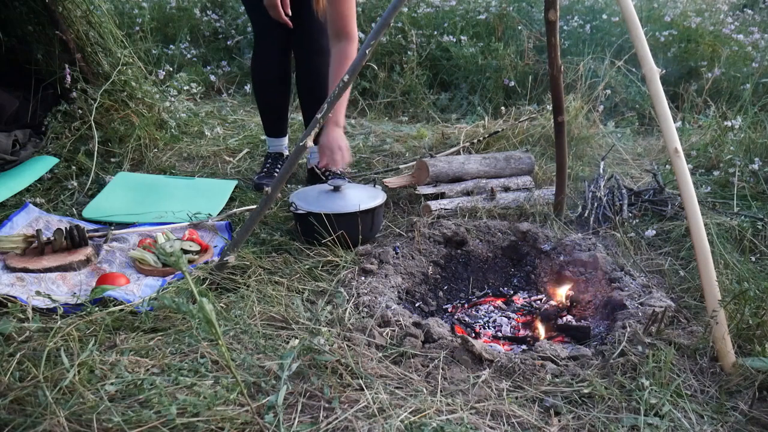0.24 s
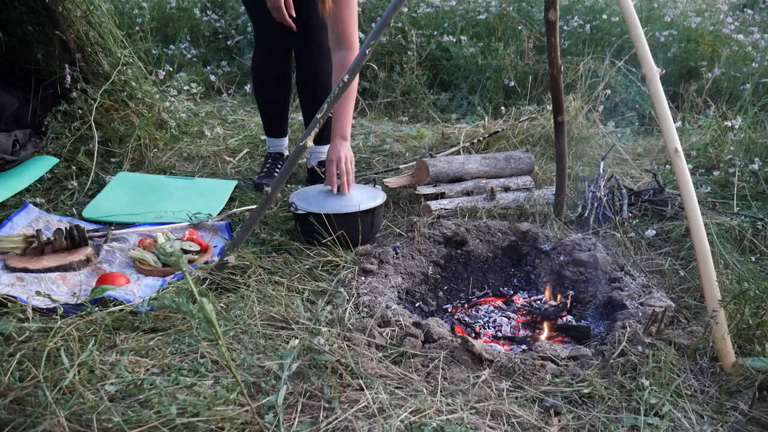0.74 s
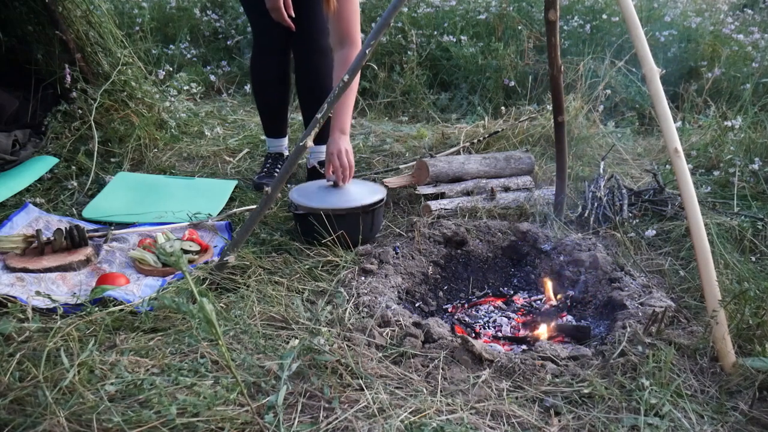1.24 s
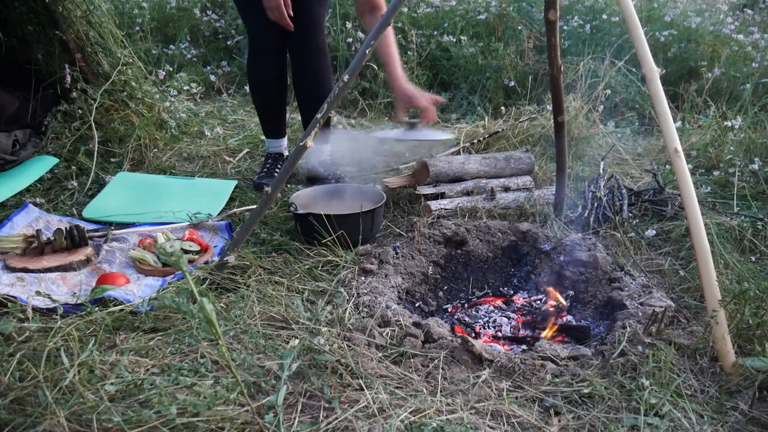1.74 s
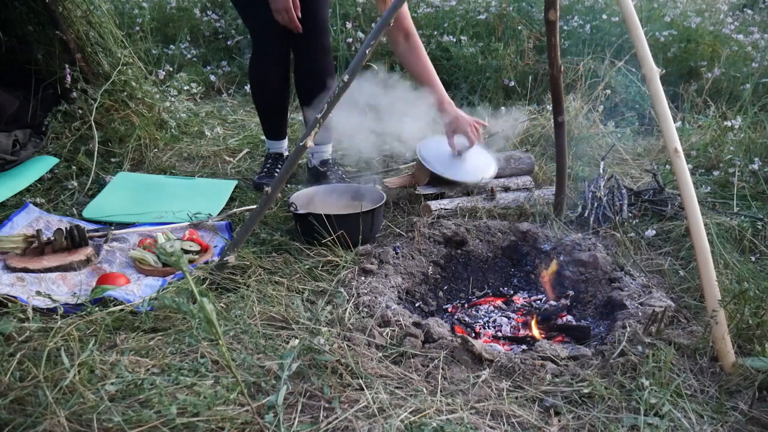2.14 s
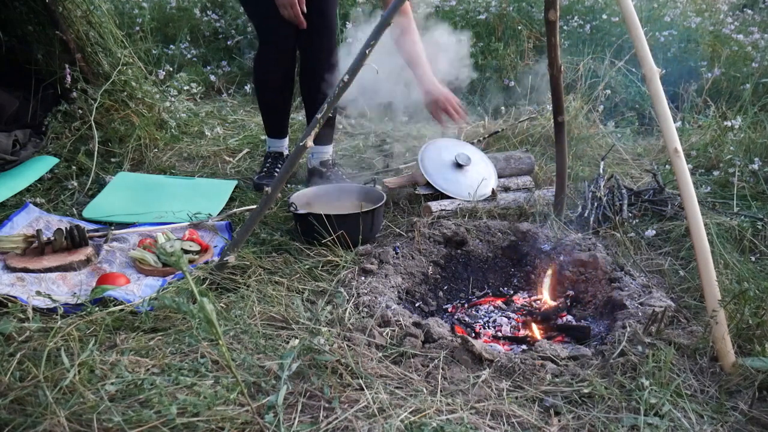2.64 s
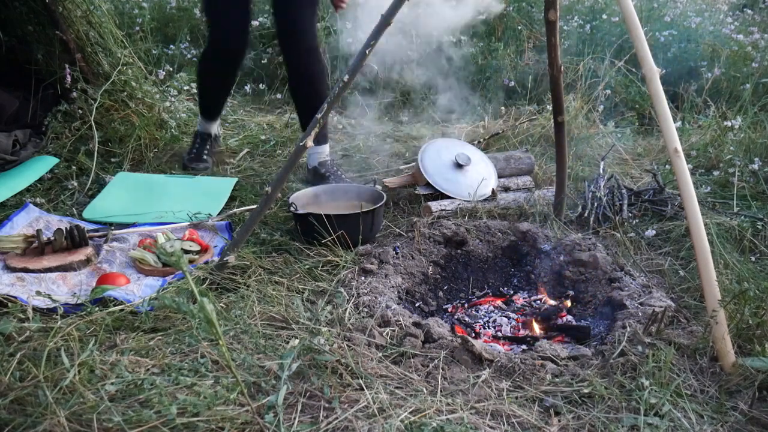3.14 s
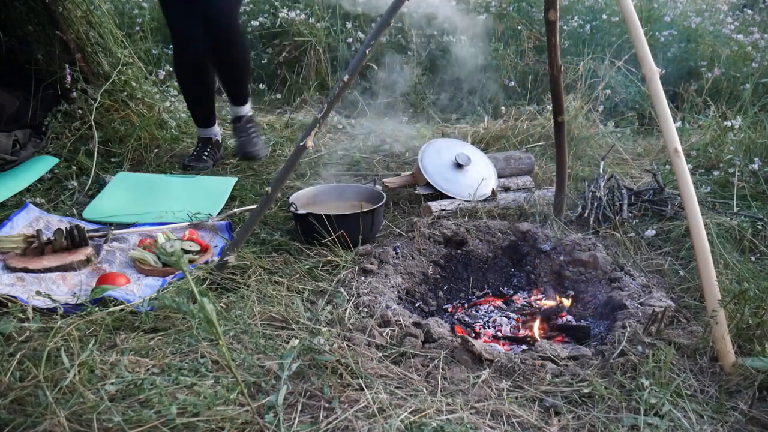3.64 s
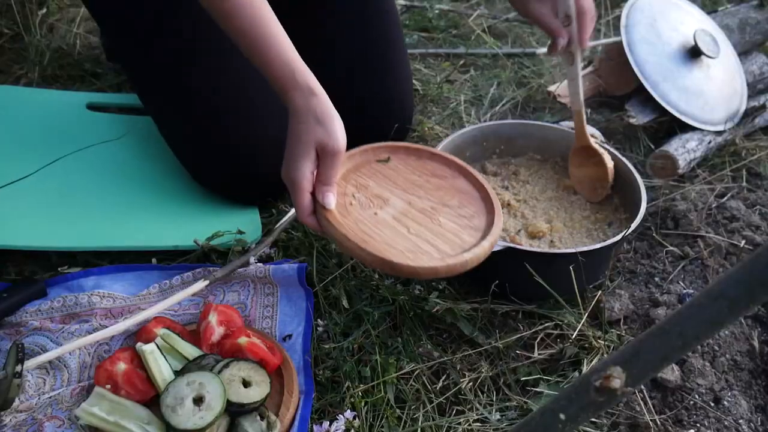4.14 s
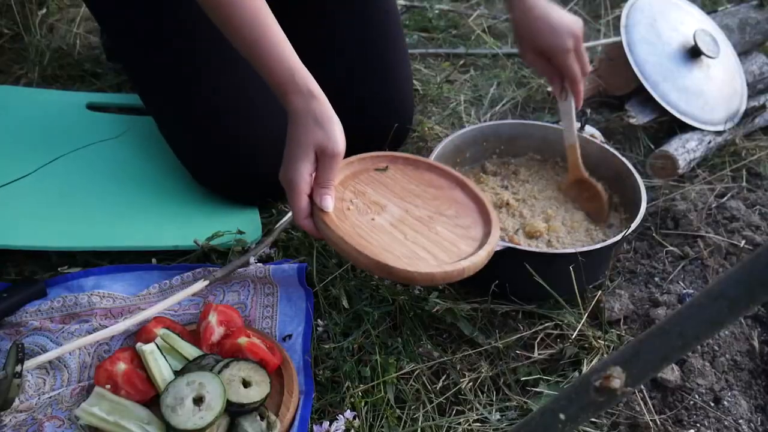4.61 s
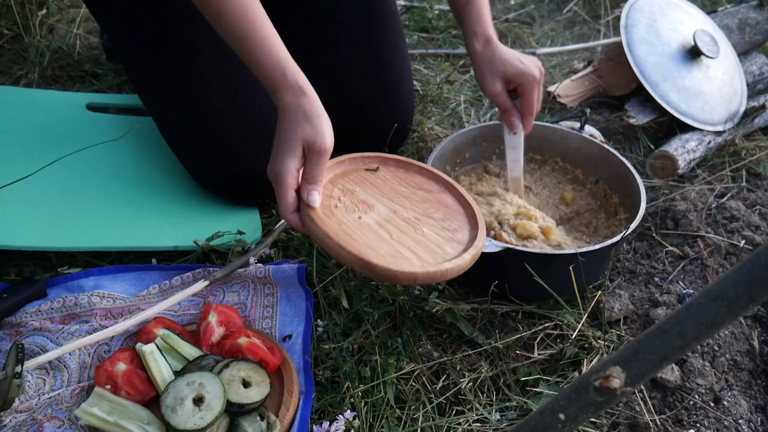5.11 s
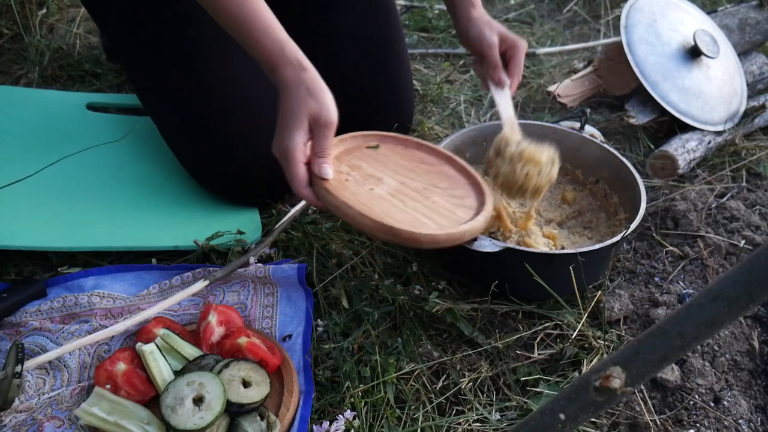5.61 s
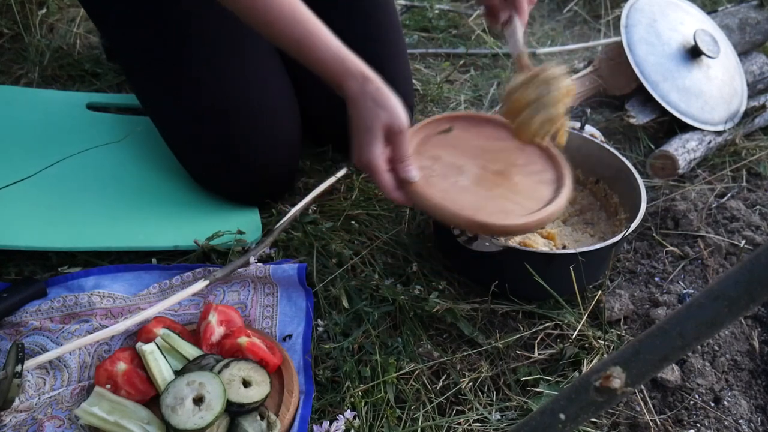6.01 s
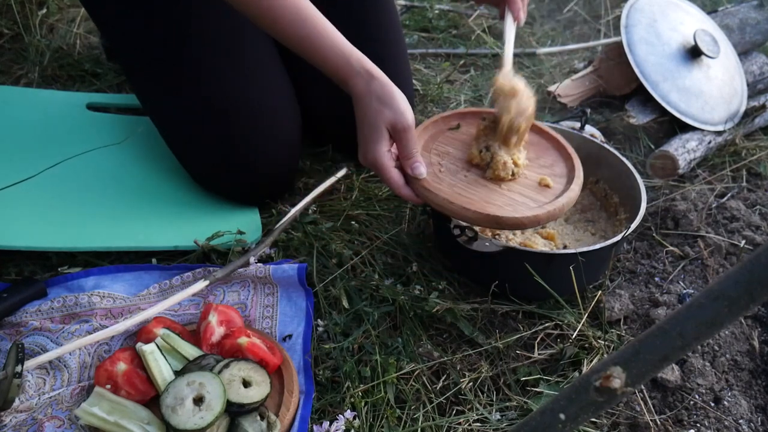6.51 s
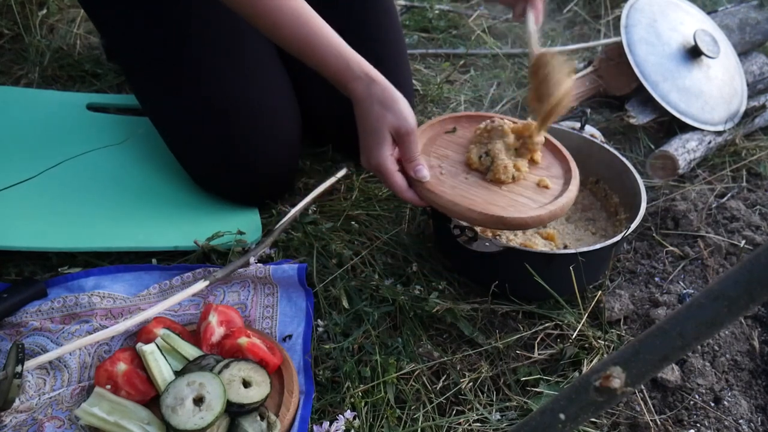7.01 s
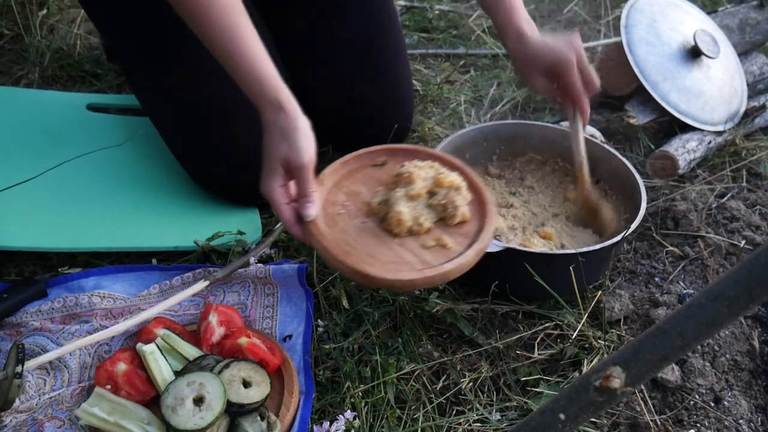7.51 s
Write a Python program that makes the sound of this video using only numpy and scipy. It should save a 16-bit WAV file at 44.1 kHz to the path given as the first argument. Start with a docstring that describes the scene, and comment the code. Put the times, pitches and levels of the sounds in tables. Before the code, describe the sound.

A calm campsite in open air, with a low soft hush, faint unsteady crickets and barely audible far hums. At 0.1 s a metal lid clanks hard on a pot rim, bright and short with a quick rattle; a light touch follows at 0.75 s. A small bird sings thin, falling notes from 0.25 to 1.2 s, then faint raspy chirps until 1.9 s. At 2.1 s grass brushes and the lid bumps a log; at 2.2 s it rings loudly, clattering and thudding until 2.4 s. Feet shuffle in grass from 2.7 to 3.5 s, with faint cheeps near 3 s. Tiny dry ticks and dull bumps continue. A light spoon tap comes at 4.7 s, soft stirring at 5-5.5 s, a weak high cricket trill at 5.7 s, and a clear wooden knock at 6.1 s. After a quieter spell, bumps and rustling return from 7.2 to 7.75 s.

```python
"""The lid of a cooking pot clanks on its rim, then is dropped against a log: ringing modes, clatter noise and thuds.
A wooden spoon knocks on pot and plate and dull bumps sound, all as decaying modes. Grass rustles and feet
shuffle as shaped noise; embers and stalks tick as short noise puffs. A bird and far notes are gliding tones,
crickets and far hums narrow noise bands, over a soft broadband hush at a campsite."""
import sys
import numpy as np
from scipy import signal
from scipy.fft import rfft, irfft, next_fast_len
from scipy.io import wavfile
from scipy.ndimage import uniform_filter1d, map_coordinates

SR = 44100
rng = np.random.default_rng(int(sys.argv[2]) if len(sys.argv) > 2 else 0)


def unload_wav(signal):
    """Save mono or channel-first audio to the path in sys.argv[1] as 16-bit WAV at rate SR, clipped to [-1, 1]."""
    wavfile.write(
        sys.argv[1],
        SR,
        np.round(np.clip(np.atleast_2d(signal).T, -1, 1) * 32767).astype(np.int16),
    )


N = 342203


def amp(db):
    """dB to gain."""
    return 10 ** (np.asarray(db) / 20)


def unit(x):
    """Scaled to rms 1."""
    return x / np.sqrt(np.mean(x ** 2) + 1e-20)


def along(points, hz):
    """Interpolates (Hz, value) points on a log frequency axis."""
    point_hz, value = np.transpose(points)
    return np.interp(np.log(hz + 1), np.log(point_hz + 1), value)


def shape(points):
    """Frequency response through (Hz, dB) points."""
    return lambda hz: amp(along(points, hz))


def curves(rows):
    """One value per sample for each column after the time."""
    time_s, *columns = np.transpose(rows)
    return [np.interp(np.arange(N) / SR, time_s, column) for column in columns]


def wobble(knots_per_s, size=N):
    """A smooth random curve through normally distributed knots."""
    knots = rng.standard_normal(int(size * knots_per_s / SR) + 4)
    return map_coordinates(knots, [np.arange(size) * knots_per_s / SR])


def filtered(x, response):
    """x times a response of frequency."""
    n = x.shape[-1]
    padded = next_fast_len(n + 4096)
    return irfft(rfft(x, padded) * response(np.fft.rfftfreq(padded, 1 / SR)), padded)[..., :n]


def band(centre_hz, width_hz):
    """Response of one causal resonance."""
    return lambda f: 1j * f * width_hz / (centre_hz ** 2 - f * f + 1j * f * width_hz)


def add(out, start_s, x, pan_db=0):
    """Lays a sound into the stereo buffer; pan_db is left over right."""
    part = out[:, round(start_s * SR):][:, :x.shape[-1]]
    part += amp([[pan_db / 2], [-pan_db / 2]]) * x[..., :part.shape[1]]


def rush(response, patchy_db, alike):
    """Stereo noise of rms 1 with time-frequency patches of random gain and a set left-right likeness."""
    z = signal.stft(rng.standard_normal((2, N)), nperseg=512)[2]
    field = uniform_filter1d(rng.standard_normal(z.shape[1:]), size=6, axis=0)
    field = uniform_filter1d(field, size=10, axis=1)
    pair = signal.istft(z * amp(patchy_db * unit(field)), nperseg=512)[1][:, :N]
    # likeness is the cosine of twice the mid-side angle
    angle = lambda hz: np.arccos(np.clip(along(alike, hz), -1, 1)) / 2
    mid, side = filtered(pair, lambda hz: response(hz) * [np.cos(angle(hz)), np.sin(angle(hz))])
    return unit(np.array([mid + side, mid - side]))


def ring(modes, scatter_db, tilt_db_per_octave=0, free_s=1, attack_s=1e-4):
    """One blow on decaying modes of scattered strength; a touch after free_s damps those that swing the rim."""
    t = np.arange(2 * SR // 5) / SR
    hz, db, t60_s = np.transpose(modes)[:, :, None]
    db = db + rng.normal(0, scatter_db, db.shape) + tilt_db_per_octave * np.log2(hz / 500)
    swings_rim = (hz > 1600) & (hz < 2060)
    held_t60_s = np.where(swings_rim, np.minimum(t60_s, .21), t60_s)
    fade_db = -60 * (np.minimum(t, free_s) / t60_s + (t - free_s).clip(0) / held_t60_s)
    tones = np.sum(amp(db + fade_db) * np.sin(2 * np.pi * hz * t), axis=0)
    return (1 - np.exp(-t / attack_s)) * tones


# hush spectrum: [hz, relative_db]
HUSH_SPECTRUM = [(12, -38.5), (20, -13), (133, 5.5), (464, 5), (704, 0.5), (1190, -7), (1370, -3),
                 (1670, -8), (2080, -4.5), (3840, -13), (4540, -12), (5520, -13), (7920, -14.5),
                 (10200, -15.5), (15400, -22.5)]
# left-right likeness of the surroundings: [hz, correlation -1 to 1]
SURROUND_ALIKE = [(60, -0.38), (180, -0.76), (550, -0.96), (1650, 0.13), (4970, 0.17), (15000, 0.61)]
HUSH_DB = -56.5


def hush():
    """Steady broadband noise whose level drifts slightly."""
    level = amp(HUSH_DB + 0.31 * wobble(1.8))
    return level * rush(shape(HUSH_SPECTRUM), patchy_db=1.85, alike=SURROUND_ALIKE)


# cricket level: [time_s, level_db]
CRICKET_LEVEL = [(0, -66.5), (1.5, -69.5), (2.2, -61), (3.1, -68), (4.4, -65), (6.3, -64), (7.76, -66.5)]


def cricket():
    """A narrow noise band that throbs quickly and irregularly."""
    throb = amp(2.5 * wobble(60) + 2.4 * wobble(2.5))
    tone = rush(lambda hz: band(4590, 330)(hz) ** 2, patchy_db=0.5, alike=SURROUND_ALIKE)
    return amp(curves(CRICKET_LEVEL)[0]) * unit(throb * tone)


# far hum levels: [time_s, low_db, high_db]
HUM_LEVELS = [(0, -67, -81.5), (2, -68, -83), (3.6, -65.5, -81), (3.8, -75, -76), (5.6, -80, -67),
              (7.1, -79, -70), (7.76, -80, -79)]


def hums():
    """Two fuzzy far hums: noise through squared resonances at 78 and 785 Hz."""
    low_db, high_db = curves(HUM_LEVELS)
    low = rush(lambda hz: band(78, 22)(hz) ** 2, patchy_db=0.0, alike=SURROUND_ALIKE)
    high = unit(filtered(rng.standard_normal((2, N)), lambda hz: band(785, 90)(hz) ** 2))
    return amp(low_db) * low + amp(high_db) * high


# how busy feet, sleeves and spoon are: [time_s, hiss_relative_db, shuffle_relative_db]
ACTIVITY = [(0, -63.5, -63), (.4, -69, -65.5), (1.83, -69.5, -65.5), (2.1, -62, -62), (2.58, -64, -66.5),
            (2.77, -59.5, -55.5), (3.0, -63, -63.5), (3.39, -59, -57), (3.6, -63, -63.5), (3.9, -67, -68.5),
            (4.55, -63.5, -72), (4.8, -65.5, -59), (5.15, -58, -55), (5.45, -58, -59.5), (5.85, -68, -69.5),
            (7.1, -71, -68), (7.35, -64, -60), (7.76, -59, -56)]
# grass hiss spectrum: [hz, relative_db]
GRASS_SPECTRUM = [(590, -32), (1000, -2.5), (1810, -4.5), (2650, 0.5), (3860, -5.5), (4640, -6),
                  (5260, -3.5), (11500, -3), (15400, -16.5)]
# shuffle spectrum: [hz, relative_db]
SHUFFLE_SPECTRUM = [(35, -42.5), (60, -10), (187, 1.5), (776, -2), (921, -11), (1490, -12), (1640, -15.5),
                    (2500, -15), (3250, -41.5), (5500, -120)]
# short brushes through grass and along bark: [start_s, length_s, level_db]
BRUSHES = [(.17, .1, -51), (2.1, .095, -46.5), (2.2, 0.22, -52.5), (2.72, .13, -56), (4.38, 0.043, -57.5),
           (4.96, 0.18, -63), (5.27, .1, -61), (5.43, .17, -62)]


def rustle():
    """Feet, sleeves and the spoon in the food: hiss with crackling grains, and a low unsteady shuffle."""
    hiss_db, shuffle_db = curves(ACTIVITY)
    t = np.arange(N) / SR
    strokes = np.zeros(N)
    for start_s, length_s, level_db in BRUSHES:
        progress = ((t - start_s) / length_s).clip(0, 1)
        # the power makes each stroke rise fast and fall slowly
        strokes += amp(level_db) * np.abs(np.sin(np.pi * progress ** 0.33)) ** .9
    grains = amp(3 * uniform_filter1d(rng.exponential(1, N) ** 2, size=60) + 1.2 * wobble(21))
    grass = rush(shape(GRASS_SPECTRUM), patchy_db=0.3, alike=[(1000, 0.34), (10000, .7)])
    hiss = unit(grains * grass)
    unsteady = amp(3 * wobble(45) + 1.8 * wobble(12))
    low_noise = rush(shape(SHUFFLE_SPECTRUM), patchy_db=-0.5, alike=[(150, .3), (1500, 0.36)])
    shuffle = unit(unsteady * low_noise)
    return (amp(hiss_db + 0.5) + strokes) * hiss + amp(shuffle_db - 1.0) * shuffle


# modes of the lid lying on the pot: [hz, relative_db, t60_s]
SEATED_MODES = [(200, -9.5, 0.092), (588, -10, .1), (1581, -11, 0.062), (1990, -7, 0.097),
                (2101.4, -1, 0.4), (2320, -6, .12), (2580, -4, 0.066), (2910, -9, 0.11),
                (3093, -13.5, 0.22), (3210, -14, .16), (3633, -7, .1), (3890, -12, .09), (4700, -9.5, 0.2),
                (5250, -8, 0.11), (5770, -9.5, 0.087), (6250, -14, .07), (6860, -9, .07),
                (8140, -1.5, 0.085), (8500, -9.5, 0.064), (9200, -14, .07), (9900, -12, 0.067),
                (11000, -8, 0.082)]
# modes of the lid leaning on the log: [hz, relative_db, t60_s]
LEANING_MODES = [(496.8, -28, .33), (1351, -25.5, .15), (1440, -30.5, 0.32), (1749, -1.5, .05),
                 (1815.5, -12.5, .2), (1952, -4, 1.3), (2010, -5.5, .3), (2110, -10, 0.35),
                 (2410, -10.5, .33), (2602, -11.5, .17), (2775, -19, .18), (2904, -23, 0.23),
                 (2939, -22, 0.25), (3045, -21, .2), (3117, -22.5, 0.22), (3770, -30.5, .2),
                 (4127, -31, 0.5), (4660, -17, 0.22), (5335, -29.5, .1), (6323, -35.5, .1),
                 (6700, -31, .08), (8200, -36, .1), (9130, -28.5, .14), (9895, -31.5, 0.13)]
# clatter spectrum on the rim: [hz, relative_db]
RIM_SPECTRUM = [(180, -38), (300, -8), (1100, -19), (2000, -4), (3330, -10.5), (5740, -10), (7600, -10.5),
                (8260, -8.5), (11500, -13.5), (15400, -28)]
# clatter spectrum on the log: [hz, relative_db]
LOG_SPECTRUM = [(120, -43.5), (200, -15.5), (1050, -13), (1430, -10), (2010, -10), (2700, -7), (3350, -37),
                (3810, -16), (4650, -25.5), (5000, -24.5), (9630, -33), (15400, -49)]
# clatter decay on the rim: [t60_s, loose_rattle_db, loose_t60_s]
RIM_DECAY = (.055, -39.5, .15)
# clatter decay on the log: [t60_s, loose_rattle_db, loose_t60_s]
LOG_DECAY = (.034, -16, .24)
# lid contacts, on the rim until it is lifted, then on the log: [start_s, ring_db, clatter_db, thud_db]
LID_HITS = [(.068, -60, -46.5, -60), (.114, -18, -2, -26), (.134, -33, -19.5, -28),
            (.154, -29.5, -19.5, -29), (.1585, -26, -10.5, -30), (.170, -37.5, -22.5, -20.5),
            (.752, -48, -35.5, -47), (2.106, -26, -31, -19), (2.168, -52, -46.5, -30.5),
            (2.198, -4.5, -7.5, -24.5), (2.258, -18.5, -13, -33.5), (2.269, -20, -13, -16.5),
            (2.293, -32, -29, -37), (2.303, -27.5, -19.5, -18), (2.319, -41, -29.5, -36),
            (2.342, -58, -35.5, -36), (2.359, -49, -38.5, -34)]
LIFTED_S = 1.4
FREE_FROM_S, FREE_UNTIL_S = 2.19, 2.264  # out of the hand, not yet resting on the log
CLATTER_SIDE_DB, CLATTER_ATTACK_S = -16, .0004


def lid_contacts(hits, modes, spectrum, decay, thud_hz, pan_db, free_s_at):
    """Each contact rings the metal, sets loose parts clattering and thuds into what it lands on."""
    out, t = np.zeros((2, N)), np.arange(SR // 4) / SR
    t60_s, loose_db, loose_t60_s = decay
    clatter_fade = amp(-60 * t / t60_s) + amp(loose_db - 60 * t / loose_t60_s)
    clatter_attack = 1 - np.exp(-t / CLATTER_ATTACK_S)
    support = [(thud_hz * .7, -6, .04), (thud_hz, 0, .034), (thud_hz * 2.1, -4, .03)]
    for start_s, ring_db, clatter_db, thud_db in hits:
        metal = ring(modes, scatter_db=3.0, free_s=free_s_at(start_s), attack_s=0.0005)
        add(out, start_s, amp(ring_db) * metal, pan_db)
        mid, side = unit(filtered(rng.standard_normal((2, len(t))), shape(spectrum)))
        noise = mid + amp(CLATTER_SIDE_DB) * np.outer([1, -1], side)
        add(out, start_s, amp(clatter_db) * clatter_fade * clatter_attack * noise, pan_db * 0.43)
        thud = ring(support, scatter_db=3.0, attack_s=.0007)
        add(out, start_s, amp(thud_db) * thud, pan_db * .4)
    return out


def lid():
    """The seated lid on the pot rim, then the leaning lid on the log, undamped while free of the hand."""
    on_rim = [hit for hit in LID_HITS if hit[0] < LIFTED_S]
    on_log = [hit for hit in LID_HITS if hit[0] > LIFTED_S]
    log_free_s = lambda start_s: max(FREE_UNTIL_S - start_s, 0) * (start_s > FREE_FROM_S)
    rim = lid_contacts(on_rim, SEATED_MODES, RIM_SPECTRUM, RIM_DECAY, thud_hz=260, pan_db=2.5,
                       free_s_at=lambda start_s: .31)
    log = lid_contacts(on_log, LEANING_MODES, LOG_SPECTRUM, LOG_DECAY, thud_hz=290, pan_db=-4.5,
                       free_s_at=log_free_s)
    return rim + log


# bird syllables, note by note: [offset_s, length_s, first_hz, last_hz, relative_db, roughness 0-1]
WARBLE = [(0, .065, 2353, 2344, -2, .5), (0.008, .085, 2088, 2067, 0, .15)]
# same columns as WARBLE: [offset_s, length_s, first_hz, last_hz, relative_db, roughness 0-1]
STEP = [(0, .065, 2350, 2260, -0.91, 0.43), (.062, .09, 2050, 2123, 0, .15)]
# same columns as WARBLE: [offset_s, length_s, first_hz, last_hz, relative_db, roughness 0-1]
FLOURISH = [(0, .057, 3690, 3900, -7.5, .42), (.033, .035, 3075, 2985, 0, .2)]
# same columns as WARBLE: [offset_s, length_s, first_hz, last_hz, relative_db, roughness 0-1]
RASP = [(0, .045, 3038, 2994, -2, .65), (.003, .09, 2712, 2680, 0, .45), (.086, .044, 3010, 2955, 2, .45),
        (.088, .065, 2718, 2730, -1, .27)]
# same columns as WARBLE: [offset_s, length_s, first_hz, last_hz, relative_db, roughness 0-1]
CHEEP = [(0.00067, .035, 2240, 2195, 0, .25)]
# bird song: [syllable, start_s, relative_db]
SONG = [(WARBLE, .246, -49.5), (STEP, .418, -51.5), (WARBLE, .69, -52.5), (STEP, .862, -54),
        (FLOURISH, 1.112, -49.5), (RASP, 1.345, -60), (RASP, 1.576, -59.5), (RASP, 1.826, -58),
        (CHEEP, 2.884, -59), (CHEEP, 3.091, -58)]
# faint notes from afar: [start_s, length_s, first_hz, last_hz, relative_db, roughness 0-1]
FAR_NOTES = [(3.585, .075, 2590, 2600, -58.5, 0.5), (5.867, .085, 733, 806, -56.5, 0.19),
             (6.623, .1, 1023, 1045, -63.5, 0.52)]


def bird_and_far_notes():
    """Thin gliding tones; rough ones flutter in strength and carry a scratchy band of noise."""
    out = np.zeros((2, N))
    notes = list(FAR_NOTES)
    for syllable, start_s, song_db in SONG:
        for offset_s, length_s, first_hz, last_hz, note_db, rough in syllable:
            notes.append((start_s + offset_s, length_s, first_hz, last_hz, song_db + note_db, rough))
    for start_s, length_s, first_hz, last_hz, relative_db, rough in notes:
        n = round(length_s * SR)
        phase = 2 * np.pi * np.cumsum(np.linspace(first_hz, last_hz, n)) / SR
        swell = np.sin(np.linspace(0, np.pi, n)).clip(0) ** 0.56
        tone = (1 - rough + rough * wobble(250, size=n)) * np.sin(phase)
        scratch = unit(filtered(rng.standard_normal(n), band(first_hz, first_hz * 0.31)))
        note = swell * (tone + 0.76 * rough * scratch)
        add(out, start_s, amp(relative_db + 6.0) * note, pan_db=-8.0)
    return out


# embers, stalks and gear clicking: [start_s, level_db, centre_hz, pan_db]
CLICKS = [(.256, -41.5, 11060, 0.5), (1.6601, -35, 10990, -1), (2.5494, -45.5, 960.6, -0.5),
          (2.5795, -27.5, 9400, 2), (2.7038, -38, 2520, -7.5), (2.7891, -40.5, 1350, 1),
          (2.9609, -35.5, 5470, -.5), (3.411, -34, 1560, -4.5), (3.4471, -42.5, 1520, -6),
          (3.489, -42, 1210, -5), (3.551, -45.5, 1610, 1), (3.6945, -41, 1800, 0),
          (3.7347, -43.5, 4830, -10), (3.789, -39.5, 6900, -1.5), (3.8714, -33.5, 9140, -4),
          (3.9494, -43, 1200, -.5), (3.9701, -41, 4670, -1), (4.118, -26.5, 9580, 1.5),
          (4.3997, -40.5, 6890, .5), (4.4782, -30, 6930, -5), (4.6241, -39, 6660, -3.5),
          (4.6851, -33.5, 6565, 0.5), (4.7305, -35.5, 6470, -2.5), (4.9528, -33.5, 7100, -2.5),
          (5.0674, -31.5, 5700, 0), (5.3353, -36, 9850, 1.5), (5.6209, -41, 5460, -1),
          (6.079, -45.5, 2800, -2), (6.1155, -26.5, 6000, 0.5), (6.403, -44, 4460, -1),
          (6.567, -34, 3130, .5), (6.9428, -36.5, 1947, -4), (7.4548, -37, 3194, -1.5),
          (7.5913, -34.5, 10380, -2), (7.658, -26.5, 10530, -.5)]
DULL_BELOW_HZ = 2900
BRIGHT_T60_S, BRIGHT_SHARPNESS = .02, 1.9  # sharpness: centre over width
DULL_T60_S, DULL_SHARPNESS = .035, 3.5
FAINT_PER_S, FAINT_OVER_SHUFFLE_DB, FAINT_SPREAD_DB = 14, 9, 1.7  # chance clicks: rate, least level, mean excess


def clicks():
    """Dying noise puffs round a centre pitch: listed ones and faint chance ones whose level follows the shuffle."""
    out, t = np.zeros((2, N)), np.arange(SR // 8) / SR
    gap, size, pitch, side = rng.random((200, 4)).T
    when_s = np.cumsum(-np.log(1 - gap)) / FAINT_PER_S
    shuffle_db = np.interp(when_s, *np.transpose(ACTIVITY)[::2])
    faint_db = shuffle_db + FAINT_OVER_SHUFFLE_DB - FAINT_SPREAD_DB * np.log(1 - size)
    faint = np.transpose([when_s, faint_db, 500 * 16 ** pitch, 6 * (side - .7)])
    for start_s, level_db, centre_hz, pan_db in [*CLICKS, *faint[when_s < N / SR]]:
        t60_s, sharpness = BRIGHT_T60_S, BRIGHT_SHARPNESS
        if centre_hz < DULL_BELOW_HZ:
            t60_s, sharpness = DULL_T60_S, DULL_SHARPNESS
        burst = rng.standard_normal(len(t)) * amp(-60 * t / t60_s)
        puff = filtered(burst, band(centre_hz, centre_hz / sharpness))
        add(out, start_s, amp(level_db) * puff / np.abs(puff).max(), pan_db)
    return out


# soft bumps: [start_s, level_db, pitch_hz]
BUMPS = [(2.796, -49, 199), (2.846, -40, 582), (3.184, -47, 557), (3.415, -42, 598), (4.117, -39.5, 155),
         (4.825, -47.5, 497), (5.091, -50, 179), (5.207, -48, 300), (5.31, -45, 588), (6.004, -47.5, 181),
         (7.208, -44, 131), (7.272, -44, 127), (7.32, -47.5, 339), (7.525, -47, 179), (7.609, -51.5, 319),
         (7.68, -52.5, 338)]
BUMP_CYCLES, OVERTONE_RATIO, OVERTONE_DB = 24, 1.465, -4.5  # cycles in a t60; second mode over the first


def bumps():
    """Feet, knees and full pot: a dull pair of modes; the lower, the longer."""
    out = np.zeros((2, N))
    for start_s, level_db, pitch_hz in BUMPS:
        upper_hz = pitch_hz * OVERTONE_RATIO
        pair = [(pitch_hz, level_db, BUMP_CYCLES / pitch_hz),
                (upper_hz, level_db + OVERTONE_DB, BUMP_CYCLES / upper_hz)]
        add(out, start_s, ring(pair, scatter_db=1.5, attack_s=0.00078))
    return out


# modes of plate and spoon: [hz, relative_db, t60_s]
WOOD_MODES = [(152, -26, 0.079), (235.6, -8.5, 0.047), (390, 2, 0.027), (517, 4.5, 0.039), (637, -4, 0.03),
              (760, -15.5, 0.04), (956, -10.5, 0.031), (1444, -10, 0.031), (1670, -9, .02),
              (1950, -13, 0.023), (2552, -21, 0.031), (2620, -18.5, 0.029), (3330, -26, 0.016)]
# spoon on wood: [start_s, level_db, hardness_db_per_octave]
KNOCKS = [(4.728, -28.5, 5.5), (6.122, -12.5, -1)]


def spoon():
    """A soft-edged knock; the harder it is, the more upper modes of the wood it wakes."""
    out = np.zeros((2, N))
    for start_s, level_db, hardness in KNOCKS:
        knock = ring(WOOD_MODES, scatter_db=1.13, tilt_db_per_octave=hardness, attack_s=0.0012)
        add(out, start_s, amp(level_db) * knock, pan_db=-3.0)
    return out


# a higher cricket: [start_s, length_s, level_db]
TRILLS = [(5.738, .258, -65), (6.135, 0.125, -66.5)]
TRILL_HZ, TRILL_WIDTH_HZ, PULSES_PER_S = 5180, 119.5, 31


def trills():
    """Even pulses of a high, slightly unsteady tone made from narrow-band noise."""
    out = np.zeros((2, N))
    for start_s, length_s, level_db in TRILLS:
        t = np.arange(round(length_s * SR)) / SR
        pulses = np.abs(np.sin(np.pi * PULSES_PER_S * t)) ** 3
        tone = unit(filtered(rng.standard_normal(len(t)), band(TRILL_HZ, TRILL_WIDTH_HZ)))
        add(out, start_s, amp(level_db) * pulses * tone)
    return out


# the answer of ground, logs and bushes: [hz, t60_s]
YARD_DECAY = [(200, .12), (600, .15), (2000, 0.3), (10000, .25)]


def yard(x):
    """Convolves with noise in which each frequency dies at its own speed, independent in each channel."""
    hz, t, z = signal.stft(rng.standard_normal((2, SR // 2)), SR, nperseg=256)
    fade = amp(-60 * t / along(YARD_DECAY, hz)[:, None])
    tail = signal.istft(z * fade, SR, nperseg=256)[1]
    return signal.fftconvolve(x.mean(axis=0)[None], tail / np.linalg.norm(tail[0]), axes=1)[:, :N]


def scene():
    """Everything at the microphone; the blows carry little deep bass."""
    blows = lid() + spoon() + clicks() + bumps()
    blows = filtered(blows, lambda hz: (1j * hz / (90 + 1j * hz)) ** 3)
    notes = bird_and_far_notes()
    answer = yard(amp(-22) * blows + amp(-6.5) * notes)
    surroundings = hush() + cricket() + trills() + hums()
    return blows + notes + answer + rustle() + surroundings


TOP_HZ = 15600


def record(dry):
    """The microphone dips narrowly near 8 kHz, rounds off the loudest peaks and passes nothing from TOP_HZ up."""
    heard = filtered(dry, lambda hz: 1 - .5 * band(7850, 450)(hz))
    clipped = heard / (1 + np.abs(heard / 1.05) ** 8) ** (1 / 8)
    return filtered(clipped, lambda hz: hz < TOP_HZ)


dry = scene()
out = record(dry)
unload_wav(out)
```